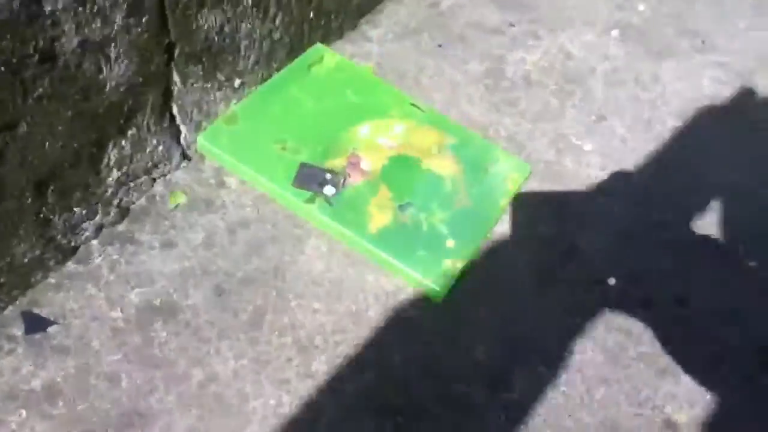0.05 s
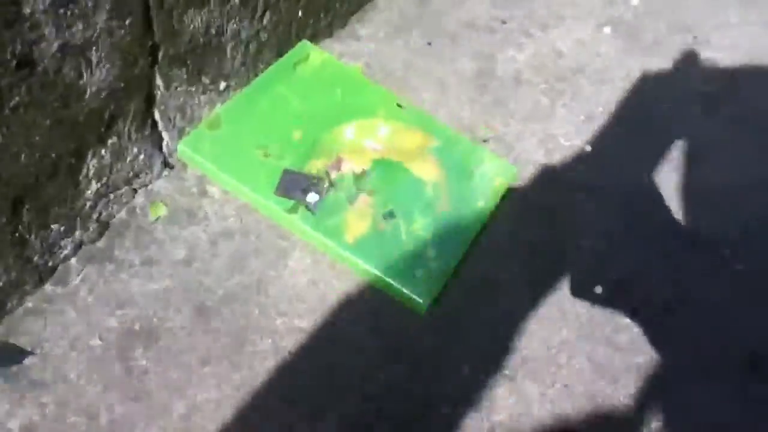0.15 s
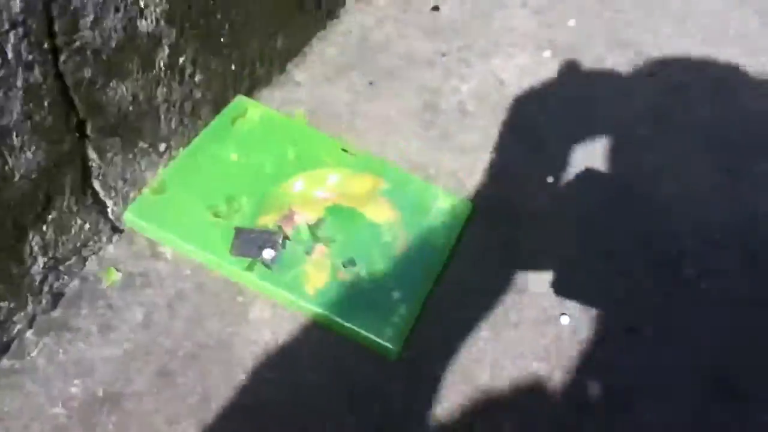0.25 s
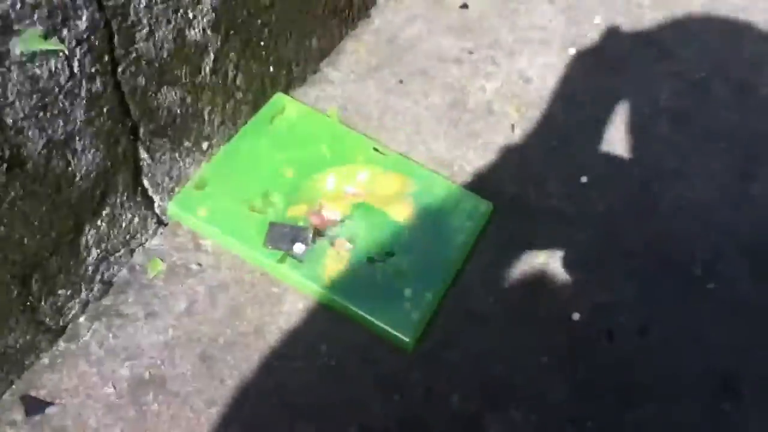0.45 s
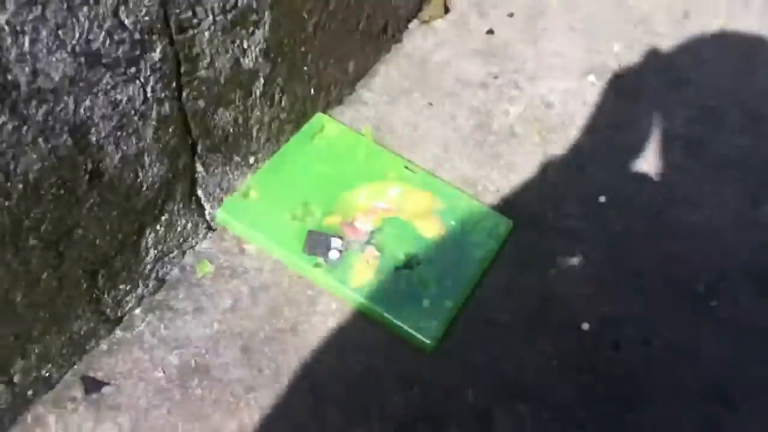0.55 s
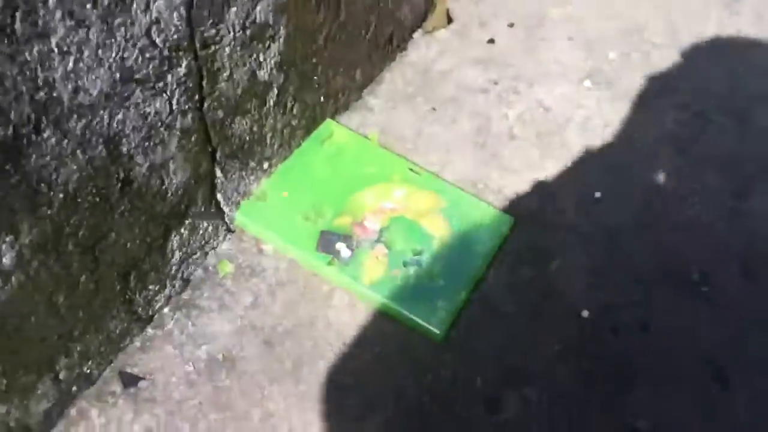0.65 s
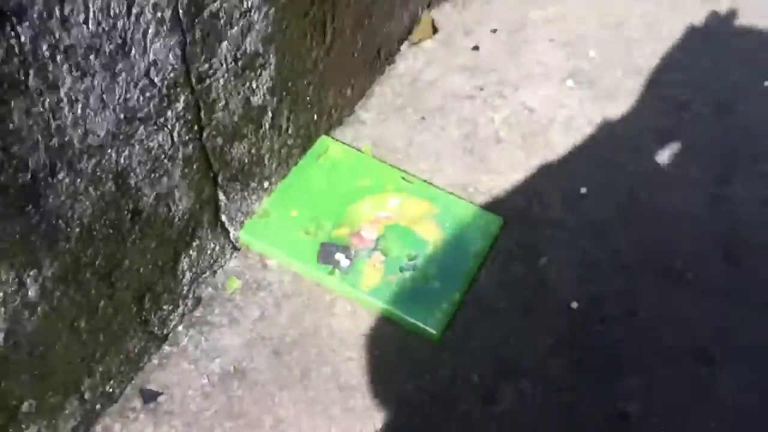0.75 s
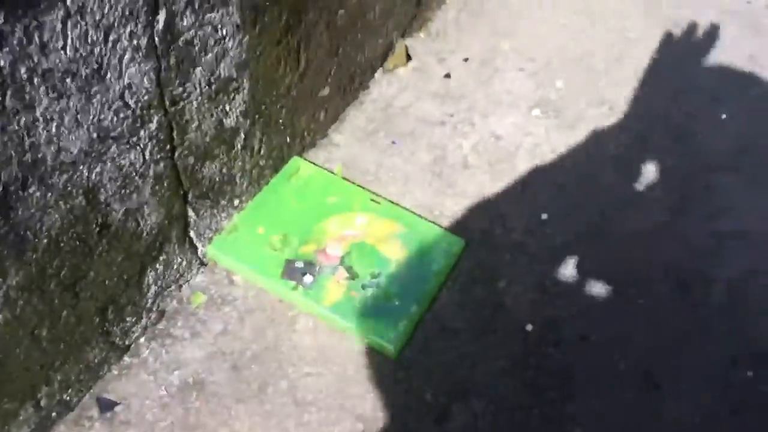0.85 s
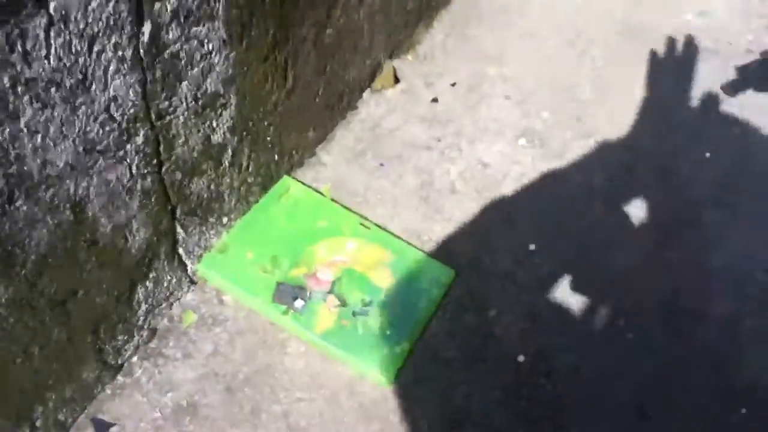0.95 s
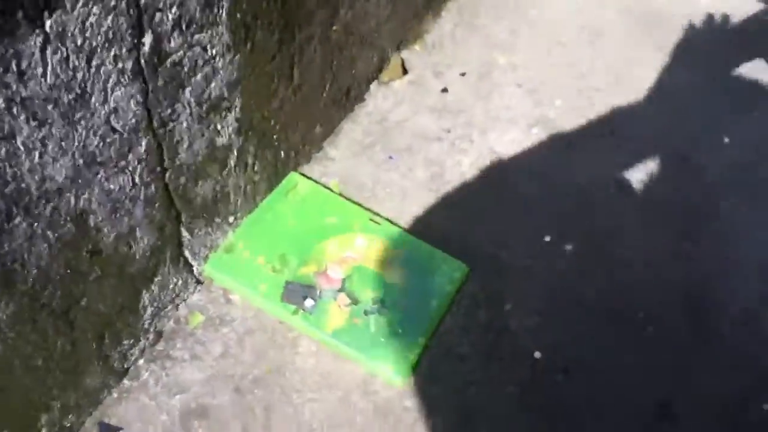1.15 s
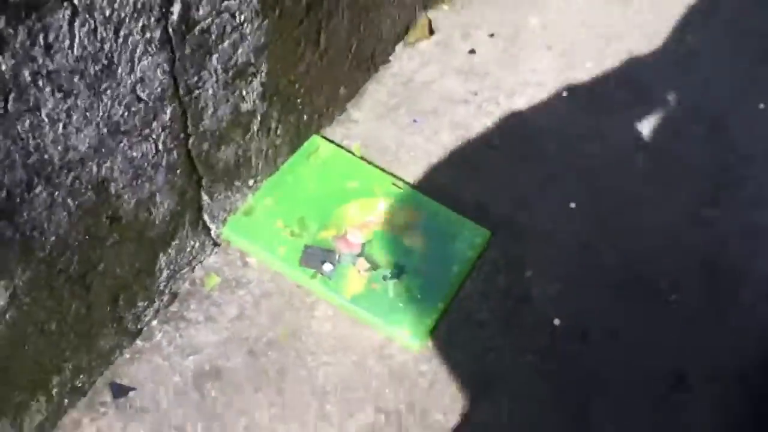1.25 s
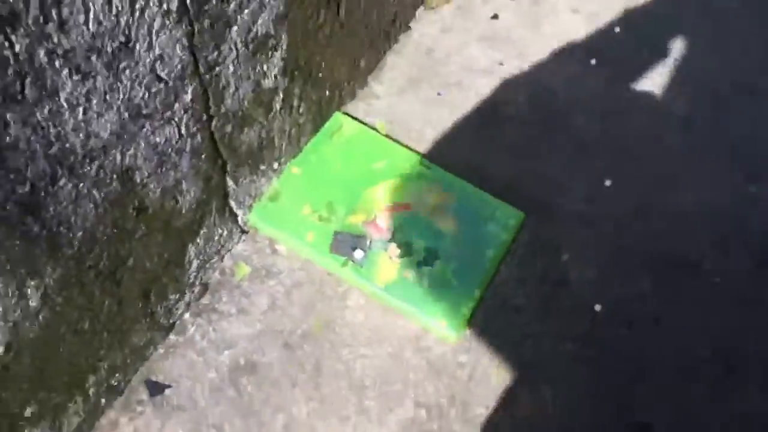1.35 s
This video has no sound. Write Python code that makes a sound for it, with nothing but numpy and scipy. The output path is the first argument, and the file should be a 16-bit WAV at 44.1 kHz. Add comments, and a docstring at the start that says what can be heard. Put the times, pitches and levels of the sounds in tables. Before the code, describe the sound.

An electric pellet gun whirrs and snaps five times, its pellets smacking a plastic case.

```python
"""An electric pellet gun fires five shots at a plastic case lying on concrete beside a wall.
Gears whirr, the piston rushes forward and slams, and about 9 ms later the pellet cracks on the case.
The yard echoes each shot; loose pellets tick about over a low outdoor rumble and a few dull scuffs."""
import sys
import numpy as np
from scipy import signal
from scipy.fft import rfft, irfft, next_fast_len
from scipy.io import wavfile
from scipy.ndimage import uniform_filter1d

SR = 44100
rng = np.random.default_rng(int(sys.argv[2]) if len(sys.argv) > 2 else 0)


def waveform_to_disk(signal):
    """Save audio, clipped to [-1, 1], as 16-bit WAV at the path in sys.argv[1]."""
    frames = np.transpose(np.atleast_2d(signal))
    scaled = np.clip(frames, -1, 1) * 32767
    samples = np.round(scaled).astype(np.int16)
    wavfile.write(sys.argv[1], SR, samples)


N = 61739


def undb(db):
    """Decibels to gain."""
    return 10 ** (np.asarray(db) / 20)


def unit(x):
    """Scale to rms 1."""
    return x / np.sqrt(np.mean(x ** 2))


def noise():
    """White noise."""
    return rng.standard_normal(N)


def spikes():
    """Dense pressure spikes of equal size and random sign."""
    return np.sign(noise())


def drift(rate_hz):
    """Smooth random drift, rms 1."""
    step = max(int(SR / rate_hz), 1)
    stairs = np.repeat(noise()[:N // step + 1], step)
    return unit(uniform_filter1d(stairs, step)[:N])


def since(start_s):
    """Seconds since start_s."""
    return np.arange(N) / SR - start_s


def decay(start_s, tau_s):
    """Sudden start, exponential decay."""
    t = since(start_s)
    return (t >= 0) * np.exp(-np.maximum(t, 0) / tau_s)


def swells(rows, width_s):
    """Gaussian envelopes at (peak_s, level_db) rows."""
    return sum(undb(db) * np.exp(-(since(peak_s) / width_s) ** 2) for peak_s, db in rows)


def curve(rows):
    """Straight lines through (time_s, value) rows."""
    return np.interp(since(0), *np.array(rows).T)


def colour(x, spectrum, tilt_db_per_oct=0):
    """Minimum-phase filter of unit power gain; the tilt acts above 1024 Hz."""
    size = next_fast_len(N) * 2
    octaves = np.log2(np.maximum(np.fft.rfftfreq(size, 1 / SR), 1))
    freq_hz, gain_db = np.array(spectrum).T
    tilt_db = tilt_db_per_oct * np.maximum(octaves - 10, 0)
    gain = unit(undb(np.interp(octaves, np.log2(freq_hz), gain_db) + tilt_db))
    cepstrum = irfft(np.log(gain), size)
    cepstrum[1:size // 2] *= 2
    cepstrum[size // 2 + 1:] = 0
    return irfft(rfft(x, size) * np.exp(rfft(cepstrum)), size)[:N]


def strike(modes, start_s):
    """Damped modes struck together, each slightly detuned."""
    ring = 0
    for pitch_hz, level_db, t60_s in modes:
        detuned_hz = pitch_hz * (1 + .003 * rng.standard_normal())
        tone = np.sin(2 * np.pi * detuned_hz * since(start_s))
        ring += undb(level_db) * tone * decay(start_s, t60_s / np.log(1000))
    return ring


# time_s, level_db
RUMBLE_LEVELS = [(0, -49.5), (.16, -43), (.28, -57), (.42, -63.5), (.49, -38.5), (.58, -62), (.7, -54),
                 (.78, -47.5), (.88, -46.5), (1.03, -53.5), (1.11, -44.5), (1.17, -51.5), (1.27, -47),
                 (1.33, -47), (1.4, -39.5)]
HISS_LEVELS = [(0, -43), (.12, -51), (.8, -61), (1.4, -62.5)]
# freq_hz, gain_db
RUMBLE_SPECTRUM = [(20, -38), (55, 0.5), (80, -6.5), (135, 1.5), (220, -6.5), (330, -15.5), (460, -9),
                   (900, -23.5), (3000, -44), (15000, -75)]
AIR_SPECTRUM = [(25, -9), (120, -5), (400, -3), (800, 0), (2400, -7.5), (5400, -16), (9800, -52),
                (16000, -35)]
YARD_SPECTRUM = [(60, -11), (150, -9.5), (350, -14), (1000, -4.5), (2000, 0), (3200, 1.5), (5500, -4.5),
                 (7800, -6.5), (11000, -16), (15500, -28)]  # hiss and echoes


def outdoors():
    """Wavering low rumble, distant air and a fading hiss."""
    hiss = colour(noise() * undb(curve(HISS_LEVELS) + 2 * drift(120)), YARD_SPECTRUM)
    rumble = undb(curve(RUMBLE_LEVELS)) * colour(noise(), RUMBLE_SPECTRUM)
    air = undb(-52 - drift(26)) * colour(noise(), AIR_SPECTRUM)
    return air + hiss + rumble


# peak_s, level_db
SCUFFS = [(0.493, -38), (0.932, -41), (1.092, -40.5), (1.326, -50.5), (1.385, -50)]
# freq_hz, gain_db
SCUFF_SPECTRUM = [(60, -33), (250, -3), (650, 3.5), (1400, 4.5), (2500, -20), (6000, -24), (15000, -50)]


def scuffs():
    """Short dull scrapes on the concrete."""
    return colour(noise() * swells(SCUFFS, width_s=.012), SCUFF_SPECTRUM)


# far-wall returns: peak_s, level_db
LATE_RETURNS = [(0.43, -33.5), (.722, -36.5), (1.087, -35.5), (1.111, -36.5)]


def yard_echoes():
    """A cloud of uneven reflections and a faint tail per shot, plus a few smeared late returns."""
    echoes = swells(LATE_RETURNS, width_s=.0072) * noise()
    for slam_s, *_, echo_db in SHOTS:
        start_s = slam_s + .027
        build = 1 - decay(start_s, tau_s=.008)
        early = undb(-29) * decay(start_s, tau_s=.047)
        tail = undb(-47.5) * decay(start_s, tau_s=.28)
        reflections = unit(noise() * undb(3 * drift(700)))
        echoes += undb(echo_db) * build * (early + tail) * reflections
    return colour(echoes, YARD_SPECTRUM)


# start_s, level_db, tilt_db_per_oct
TICKS = [(.0333, -26.5, 0), (0.1445, -23.5, 6.5), (.166, -20.5, 5), (0.2537, -8, -3), (0.3385, -5.5, 0),
         (0.3499, -12.5, 1.5), (0.4341, -15.5, 4.5), (0.582, -16, 2), (0.8002, -27.5, -6.5),
         (0.8279, -24, -4.5), (0.848, -27, 5), (0.9847, -7, 0), (.9935, -14, -1), (1.004, -16, -2.5),
         (1.0258, -14.5, 0.5), (1.348, -22, 1.5), (1.3803, -23.5, -1.5)]
# freq_hz, gain_db
TICK_SPECTRUM = [(60, -22), (300, -16), (1000, -9.5), (2200, 1), (3400, 4), (5500, -1.5), (8000, -2),
                 (11000, -12.5), (15500, -27)]


def loose_pellets():
    """Pellets glance off the wall and skip on the concrete."""
    ticks = 0
    for start_s, level_db, tilt_db_per_oct in TICKS:
        envelope = decay(start_s, tau_s=.00071) + undb(-8) * decay(start_s, tau_s=.0028)
        ticks += undb(level_db - 9.5) * colour(spikes() * envelope, TICK_SPECTRUM, tilt_db_per_oct)
    return ticks


# start_s, stop_s, level_db
MOTOR_RUNS = [(0.146, 0.364, -36.5), (0.447, 0.668, -37), (.885, 1.031, -36.5)]
# freq_hz, gain_db
GEAR_SPECTRUM = [(100, -9), (400, -16.5), (850, 2), (1500, -3), (2300, -2), (4400, 3.5), (6500, -5),
                 (10000, -12.5), (15000, -26)]


def gears(tooth_hz=3200, scatter_db=1.5, rise_s=.06, fall_s=.03):
    """Uneven gear teeth click while the motor draws the spring."""
    teeth_passed = np.cumsum(tooth_hz * (1 + .15 * drift(300))) / SR
    onsets = np.diff(np.floor(teeth_passed), prepend=0)
    clicks = onsets * spikes() * undb(scatter_db * drift(400))
    effort = 0
    for start_s, stop_s, level_db in MOTOR_RUNS:
        rise = np.clip(since(start_s) / rise_s, 0, 1)
        fall = np.clip(1 - since(stop_s) / fall_s, 0, 1)
        effort += undb(level_db) * rise * fall
    return colour(unit(clicks) * effort, GEAR_SPECTRUM)


def muzzle_puffs(peak_hz=124, lag_s=.003):
    """One swing of low pressure just after each slam as air leaves the barrel."""
    puffs = 0
    for slam_s, _, thump_db, *_ in SHOTS:
        phase = 2 * np.pi * peak_hz * since(slam_s + lag_s)
        puffs += undb(thump_db - 3) * (phase ** 2 - 1) * np.exp(-phase ** 2 / 2)
    return puffs


# pitch_hz, level_db, t60_s
GUN_MODES = [(1570, -20, .012), (3045, 0.5, 0.012), (3470, -14, 0.013), (3940, -3, 0.012), (4480, 2, .018),
             (7240, -2, 0.012)]


def gun_body():
    """The piston's second contact rings the gun's body."""
    lag_s = PISTON_CONTACTS[1][0]
    return sum(undb(slam_db - 18.5) * strike(GUN_MODES, slam_s + lag_s) for slam_s, slam_db, *_ in SHOTS)


# slam_s, slam_db, thump_db, flight_s, hit_db, rush_db, echo_db
SHOTS = [(0.2345, 1, -18, 0.0098, 1, 1, -2), (0.322, 1.5, -27, .0099, 1, -6, 1),
         (0.5273, 2.5, -23.5, .0087, 0.5, 2.5, 0.5), (0.6126, 1.5, -24.5, .0086, 0, -7, -2),
         (.9675, -1, -13, .0099, -5.5, 3, 1.5)]
# lag_s, level_db
PISTON_CONTACTS = [(0, -11), (.0012, -10.5), (.0022, -4.5)]
# freq_hz, gain_db
RUSH_SPECTRUM = [(100, -13.5), (350, -14.5), (700, -3.5), (1000, -7.5), (1500, 1.5), (2600, -2.5),
                 (4000, -6.5), (9000, -28.5), (15000, -26)]
SLAM_SPECTRUM = [(60, -18.5), (200, -15), (550, -17.5), (950, -7), (1500, -11), (3000, 1), (4200, 1.5),
                 (6000, -7), (7000, -2), (10000, -8.5), (15500, -20)]
THUMP_SPECTRUM = [(30, -7.5), (80, 0.5), (150, 1.5), (300, 0), (700, -1.5), (1500, -8), (4000, -30.5),
                  (15000, -68)]


def piston(rush_rise_s=.0028, rush_fall_s=.0008, thump_s=.0012):
    """A swelling rush, three hard contacts with a short body decay, and a thump of air."""
    rush = slam = thump = 0
    for slam_s, slam_db, thump_db, _, _, rush_db, _ in SHOTS:
        t = since(slam_s)
        rush += undb(rush_db - 14) * np.exp(np.minimum(t / rush_rise_s, -t / rush_fall_s))
        slam += undb(slam_db - 14.5) * decay(slam_s, tau_s=.0051)  # body
        for lag_s, contact_db in PISTON_CONTACTS:
            slam += undb(slam_db + contact_db) * decay(slam_s + lag_s, tau_s=.00025)
        thump += undb(thump_db) * np.exp(-np.abs(t) / thump_s)
    return (colour(spikes() * rush, RUSH_SPECTRUM)
            + colour(spikes() * slam, SLAM_SPECTRUM)
            + colour(spikes() * thump, THUMP_SPECTRUM))


# pitch_hz, level_db, t60_s
CASE_MODES = [(152, -5, .05), (1984, -2, 0.07), (2324, 11.5, 0.047), (2363, -5, 0.091), (2850, -22, 0.035),
              (3200, -7, .06), (3380, -17, 0.082), (4070, -1, .08), (4520, 8.5, 0.062), (5360, 1, 0.053),
              (6830, 11.5, 0.025), (7613, -5, 0.069)]
# freq_hz, gain_db
CRACK_SPECTRUM = [(60, -5), (170, -3.5), (500, -13), (1100, -3), (1900, -7), (3400, 0), (5500, -2.5),
                  (8000, -5), (11000, -10), (15500, -16.5)]


def case_hits():
    """Each pellet cracks on the thin plastic shell, which rings briefly."""
    crack = ring = 0
    for slam_s, _, _, flight_s, hit_db, *_ in SHOTS:
        hit_s = slam_s + flight_s
        impact = undb(-8) * decay(hit_s, tau_s=.0021)
        shell = undb(-16) * decay(hit_s, tau_s=.0042)
        crack += undb(hit_db) * (impact + shell)
        ring += undb(hit_db - 35) * strike(CASE_MODES, hit_s)
    return colour(spikes() * crack, CRACK_SPECTRUM) + ring


def scene():
    """Gun, case and yard in mono."""
    gun = gears() + piston() + gun_body() + muzzle_puffs()
    return (gun + case_hits() + loose_pellets() + yard_echoes() + scuffs() + outdoors())[None]


def record(dry, low_cut_hz=54, ceiling=.68, high_cut_hz=15600):
    """Microphone: bass cut, soft overload on the cracks, steep treble cut."""
    highpass = signal.butter(1, low_cut_hz, "high", fs=SR, output="sos")
    lowpass = signal.ellip(10, .2, 70, high_cut_hz, fs=SR, output="sos")
    clipped = ceiling * np.tanh(signal.sosfilt(highpass, dry) / ceiling)
    return signal.sosfilt(lowpass, clipped)


dry = scene()
out = record(dry)
waveform_to_disk(out)
```